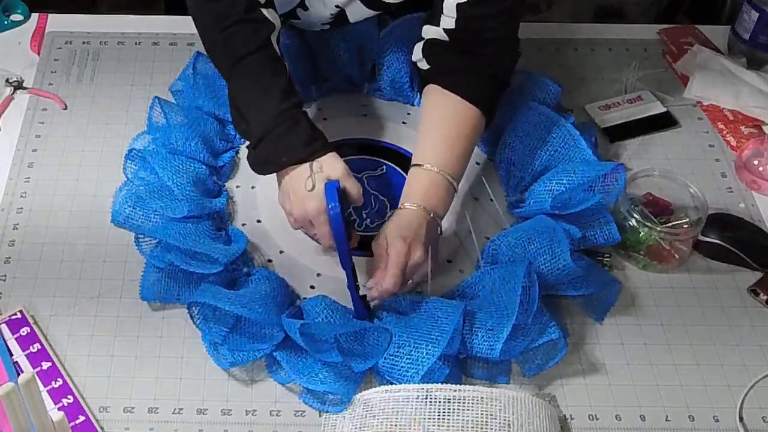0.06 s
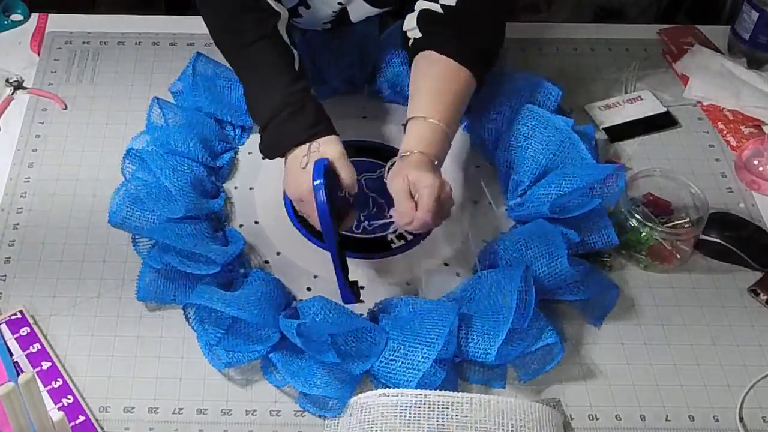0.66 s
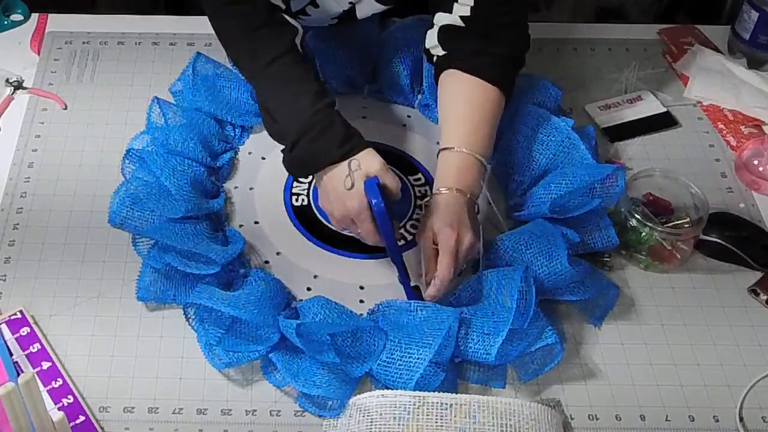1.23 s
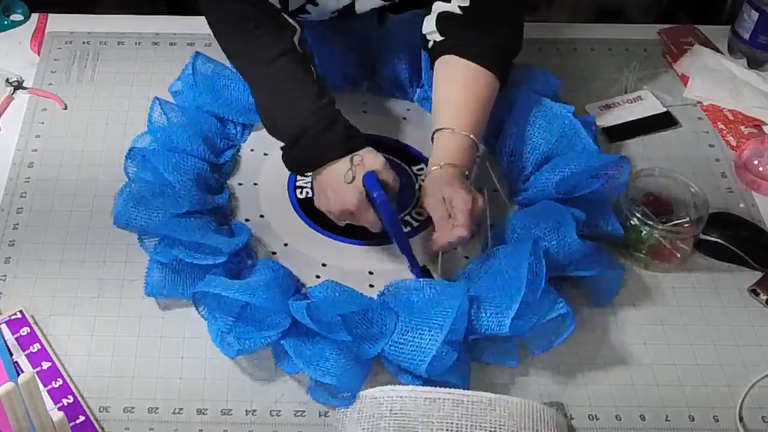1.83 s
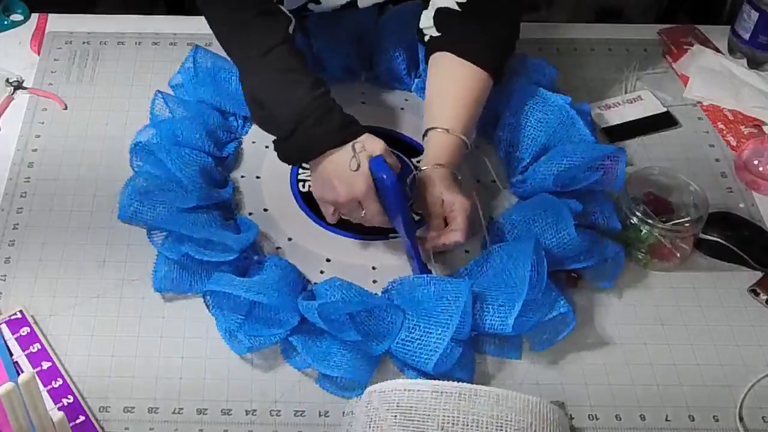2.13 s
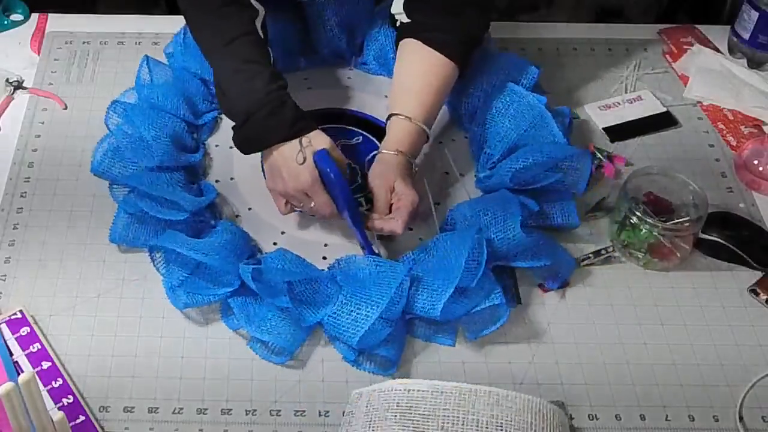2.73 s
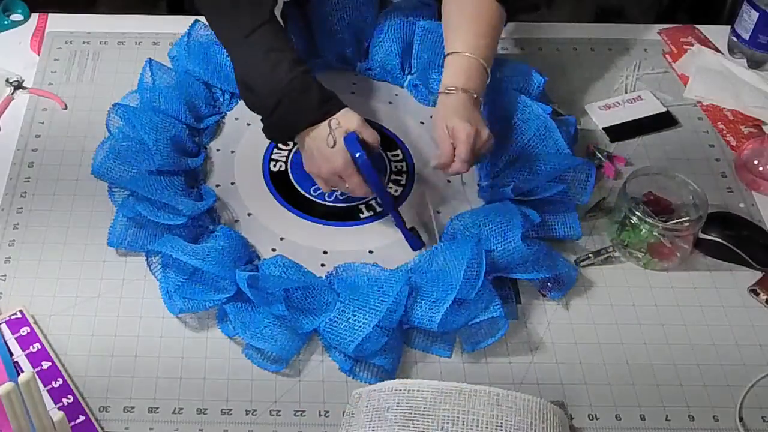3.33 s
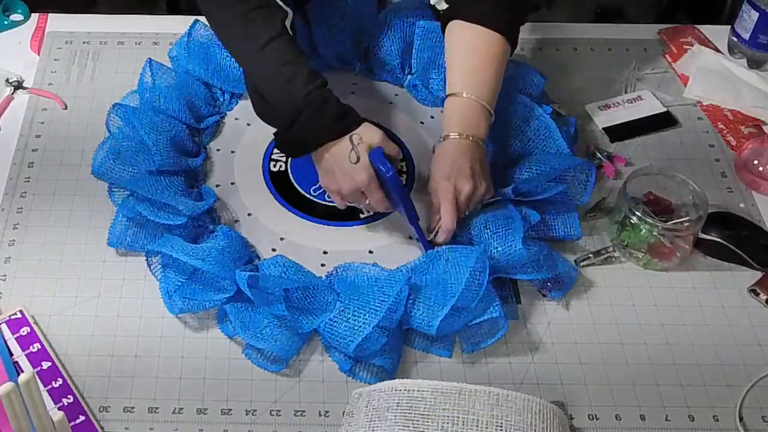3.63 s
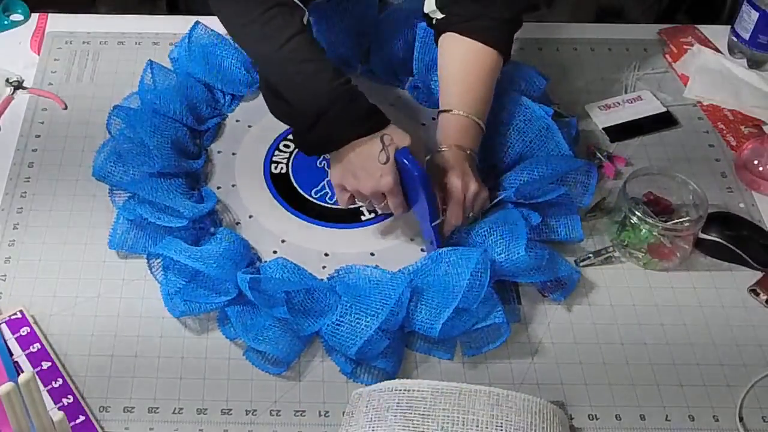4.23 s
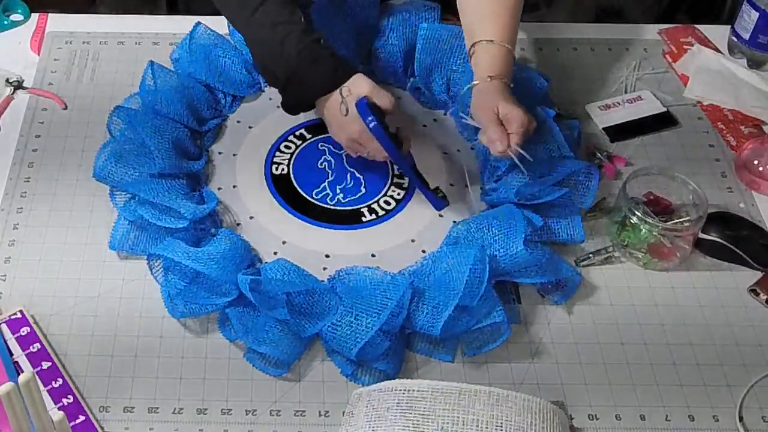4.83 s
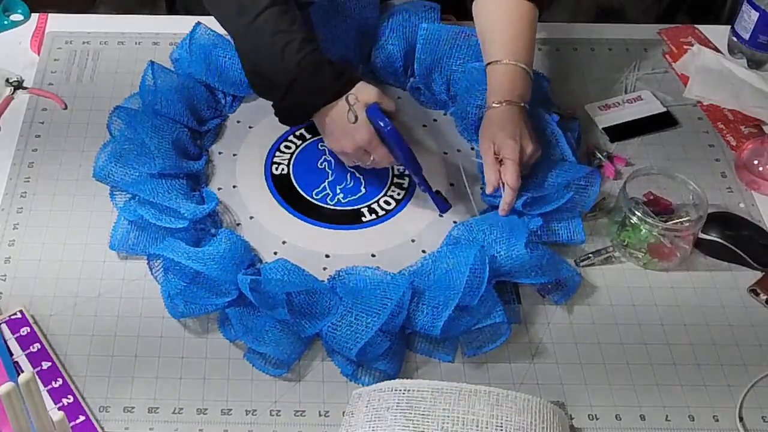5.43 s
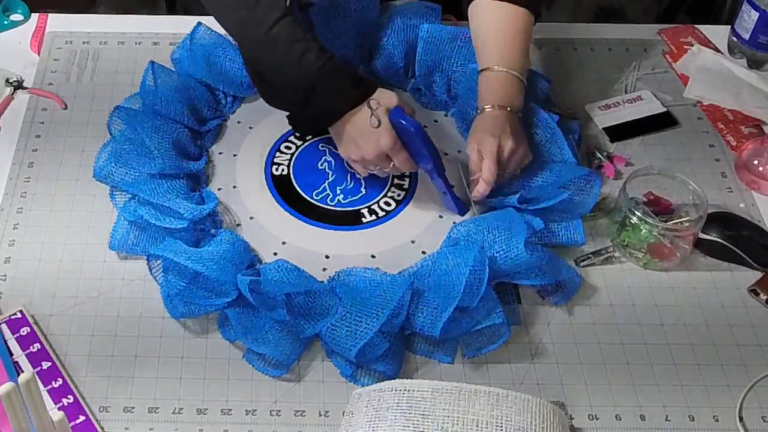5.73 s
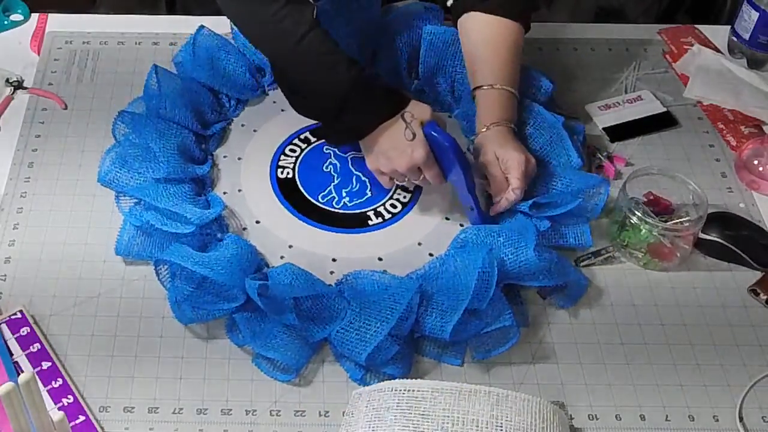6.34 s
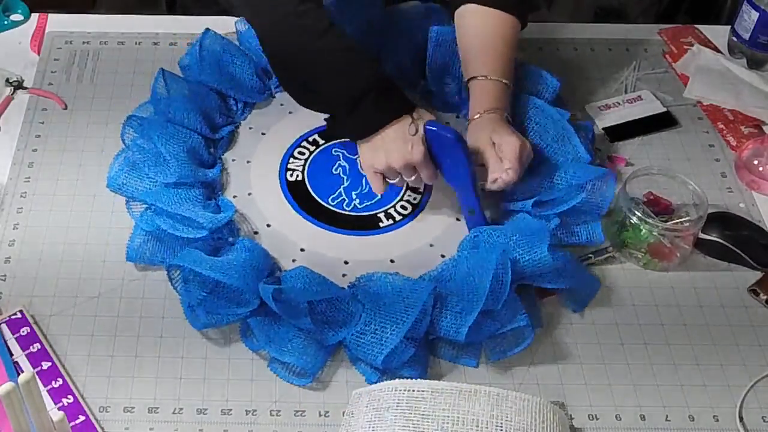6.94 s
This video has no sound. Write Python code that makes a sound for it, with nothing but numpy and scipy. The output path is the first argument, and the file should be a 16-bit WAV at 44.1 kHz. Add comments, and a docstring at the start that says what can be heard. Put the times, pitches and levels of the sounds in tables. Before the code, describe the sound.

A plastic zip tie gun fastens five ties, a second or more apart. Each squeeze gives a quick ratcheting tick and a loud, bright crack, and the first four are followed by the clack of the trigger springing back. Between ties, wreath mesh rustles faintly, the frame knocks lightly and a bangle clinks. It is heard close up at a work table in a small, live room with a low rumble.

```python
"""A plastic zip tie gun fastens five ties on a mesh wreath, on a work table in a small live room.
Each squeeze ratchets the tie through a pawl, the blade snaps it off with a loud crack, and a spring
clacks the trigger back. Between ties the mesh rustles, the frame knocks on the table and a metal
bangle clinks. The table top booms under hands and recoil, over a low room rumble."""
import sys
import numpy as np
from scipy import signal
from scipy.fft import rfft, irfft
from scipy.io import wavfile

SR = 44100
rng = np.random.default_rng(int(sys.argv[2]) if len(sys.argv) > 2 else 0)


def bounce(signal):
    """Save signal as a 16-bit WAV file at the path given by the first command-line argument."""
    frames = np.transpose(np.atleast_2d(signal))
    limited = np.clip(frames, -1, 1)
    pcm = np.round(limited * 32767).astype(np.int16)
    wavfile.write(sys.argv[1], SR, pcm)


N = 307641
TIME = np.arange(N) / SR
PATHS = 5  # left microphone, right microphone, three walls
CUTOFF_HZ = 15700

# Blade and table spectra. Each row: frequency in Hz, relative level in dB.
BLADE_SPECTRUM = [(60, -25.5), (300, -20.5), (700, -16.5), (900, -18), (1200, -13.5), (1750, -11),
                  (2800, -5), (4500, -2.5), (6500, 0), (9000, 1.5), (12000, 2.5), (14500, 2)]
TABLE_SPECTRUM = [(30, -18.5), (70, 3.5), (110, -2), (170, -7), (350, -7), (600, -20.5), (1500, -24),
                  (6000, -60.5)]
# Gun resonances. Each row: centre in Hz, width in Hz, boost in dB.
GUN_MODES = [(1345, 180, 4), (2270, 220, 9.5), (3790, 260, 4.5), (6150, 180, 6), (6980, 340, 5.5),
             (7670, 160, 1.5), (8780, 200, 5.5)]
# Cuts. Each row: start in seconds, level in dB, tilt in dB/octave, t60 in seconds, latch level in dB,
# thump level in dB, ring in Hz, ring boost in dB.
CUTS = [(0.5366, -2, -0.5, 0.018, -15, -35.5, 3850, 1), (1.7431, -3.5, -1, 0.023, -25, -37, 1214, 8.5),
        (2.937, -1.5, -2, .016, -17.5, -42, 1268, 6.5), (4.5045, -1.5, -2, 0.011, -14.5, -36, 6220, 1.5),
        (6.941, -6, -0.5, 0.04, -17.5, -44.5, 2050, 10.5)]
THUMP_T60_S = 0.13


def blade_cuts(latch_lead_s=0.0048, ring_width_hz=220):
    """The tension latch trips, the blade slams through, and the recoil thumps the table."""
    out = np.zeros((PATHS, N))
    for start_s, db, tilt_db, t60_s, latch_db, thump_db, ring_hz, ring_db in CUTS:
        modes = GUN_MODES + [(ring_hz, ring_width_hz, ring_db)]
        latch = colour(burst(t60_s=0.06, rise_s=0.0016, side_db=-15.5), BLADE_SPECTRUM, modes, -2.5)
        add(out, start_s - latch_lead_s, from_db(latch_db) * latch)
        snap = burst(t60_s, rise_s=0.0013, side_db=-12)
        add(out, start_s, from_db(db) * colour(snap, BLADE_SPECTRUM, modes, tilt_db))
        thump = burst(THUMP_T60_S, rise_s=0.003, side_db=-21)
        add(out, start_s, from_db(thump_db) * colour(thump, TABLE_SPECTRUM))
    return out


# Spring spectrum. Each row: frequency in Hz, relative level in dB.
SPRING_SPECTRUM = [(100, -41), (400, -27.5), (750, -27.5), (1400, -15.5), (2800, -2.5), (4800, 0),
                   (7000, 2), (9500, 6), (12000, 1.5), (14500, 8)]
# Slide and spring resonances. Each row: centre in Hz, width in Hz, boost in dB.
SLIDE_MODES = [(1420, 150, 6), (1750, 130, 4), (2117, 150, 8), (3666, 77, 9.5), (6245, 160, 5),
               (7300, 220, 5.5), (8850, 200, 3)]
# Slide contacts. Each row: share of run-up left, relative level in dB, added tilt in dB/octave,
# t60 in seconds.
RUN_UP = [(0.9, -25.5, -3, 0.046), (.52, -18.5, 0, .1), (0.11, -7, 1, .03)]
# Stop clack and spring rattle. Each row: relative level in dB, added tilt in dB/octave, t60 in seconds.
STOP = [(-3, 3, 0.039), (-4, -.5, .085)]
# Trigger releases. Each row: stop time in seconds, run-up in seconds, level in dB, run-up offset in dB,
# tilt in dB/octave, ring in Hz, ring boost in dB.
RELEASES = [(0.7618, 0.04, -19, 7.5, -1.5, 3800, -1), (1.9567, .034, -8, 0.5, -1, 1490, 4.5),
            (3.167, .038, -11.5, 0, -2, 2110, 5.5), (4.7114, 0.026, -8.5, 2, -1, 6400, 8.5)]


def trigger_returns(ring_width_hz=150):
    """The spring throws the slide home in a quick run of growing contacts, up to a hard stop."""
    out = np.zeros((PATHS, N))
    for stop_s, run_s, db, run_db, tilt_db, ring_hz, ring_db in RELEASES:
        modes = SLIDE_MODES + [(ring_hz, ring_width_hz, ring_db)]
        contacts = [(stop_s - share * run_s, run_db + hit_db, *rest) for share, hit_db, *rest in RUN_UP]
        contacts += [(stop_s, *part) for part in STOP]
        for start_s, hit_db, hit_tilt_db, t60_s in contacts:
            hit = burst(t60_s, rise_s=0.0012, side_db=-6)
            clack = colour(hit, SPRING_SPECTRUM, modes, tilt_db + hit_tilt_db)
            add(out, start_s, from_db(db + hit_db) * clack)
    return out


# Pawl spectrum. Each row: frequency in Hz, relative level in dB.
PAWL_SPECTRUM = [(100, -16.5), (500, -25.5), (1000, -23.5), (1400, -11), (2800, -9), (4800, -8.5),
                 (7000, -0.5), (11000, -3.5), (14500, -2.5)]
# Pawl resonances. Each row: centre in Hz, width in Hz, boost in dB.
PAWL_MODES = [(1460, 140, 4), (2280, 590, 12), (3747, 370, 9.7)]
# Squeezes. Each row: start in seconds, first gap in seconds, slip count, first slip level in dB,
# step per slip in dB, tilt in dB/octave, tie ring in Hz, ring boost in dB.
SQUEEZES = [(0.422, .0295, 5, -43.5, 1.1, 2, 2163, 8.5), (1.687, .0175, 3, -29, 0, 3.5, 1370, 6),
            (2.866, 0.014, 3, -33, 1, 1, 1847, 7), (4.3928, .047, 2, -32, -3, -.5, 3714, 9.5),
            (6.860, 0.023, 3, -30.5, -0.5, 3, 1840, 14.5)]


def ratchet(gap_ratio=0.59, creep_db=-15.5, ring_width_hz=190):
    """The taut tie rings as it slips through the pawl in quickening ticks, creeping in between."""
    out = np.zeros((PATHS, N))
    for start_s, gap_s, count, db, step_db, tilt_db, ring_hz, ring_db in SQUEEZES:
        gaps_s = gap_s * gap_ratio ** np.arange(count - 1)
        slips_s = np.cumsum([0, *gaps_s])
        pull = np.zeros((PATHS, SR // 2))
        add(pull, 0, from_db(creep_db) * radiated_noise(int(slips_s[-1] * SR), side_db=-7))
        for k, slip_s in enumerate(slips_s):
            add(pull, slip_s, from_db(k * step_db) * burst(t60_s=0.055, rise_s=0.001, side_db=-10.5))
        modes = PAWL_MODES + [(ring_hz, ring_width_hz, ring_db)]
        add(out, start_s, from_db(db) * colour(pull, PAWL_SPECTRUM, modes, tilt_db))
    return out


# Hoop modes. Each row: frequency in Hz, relative level in dB, t60 in seconds.
BANGLE_MODES = [(6400, -11, .02), (6830, -0.5, .03), (6960, 1, 0.03), (7268, -4, 0.025), (8000, -10, .015),
                (10450, -5, .025)]
# Clinks. Each row: start in seconds, peak level in dB.
CLINKS = [(2.0868, -20), (2.097, -25)]
# Slide along the wrist. Each row: time in seconds, level in dB.
BANGLE_SLIDE = [(2.3, -110), (2.4, -72.5), (2.47, -62), (2.49, -53.5), (2.58, -55), (2.62, -70),
                (2.7, -110)]


def bangle(chatter_per_s=300, size=4096):
    """Two clinks and a fine sliding chatter ring the modes of the metal hoop."""
    t = np.arange(size) / SR
    ring = sum(from_db(db - 60 * t / t60_s) * np.sin(2 * np.pi * hz * t)
               for hz, db, t60_s in BANGLE_MODES)
    touches = unit_rms(rng.standard_normal((PATHS, N)) * (rng.random(N) < chatter_per_s / SR))
    touches *= from_db(np.interp(TIME, *np.transpose(BANGLE_SLIDE))) / np.linalg.norm(ring)
    for start_s, db in CLINKS:
        touches[:, int(start_s * SR)] += from_db(db) / np.max(np.abs(ring))
    return signal.oaconvolve(touches, ring[None], axes=1)[:, :N]


# Frame spectrum. Each row: frequency in Hz, relative level in dB.
FRAME_SPECTRUM = [(100, -13), (600, -13), (1100, -12.5), (2100, -1), (3000, 0), (4500, -8.5), (7000, -18),
                  (15000, -31.5)]
# Frame resonances. Each row: centre in Hz, width in Hz, boost in dB.
FRAME_MODES = [(922, 53, 20), (1390, 45, 14), (1900, 67, 9), (3880, 400, 3.6)]
# Frame knocks and tie ticks. Each row: start in seconds, level in dB, tilt in dB/octave.
FRAME_KNOCKS = [(0.9322, -39, -1), (.988, -50, 0), (2.598, -54, -7), (2.611, -45.5, -14)]
TIE_TICKS = [(2.293, -49.5, -2.5), (2.305, -55, 0), (6.335, -63.5, -9), (6.408, -64, -6.5),
             (6.561, -60, -5.5), (6.60, -63, -7.5)]
# Table bumps. Each row: start in seconds, level in dB, t60 in seconds.
TABLE_BUMPS = [(1.921, -47, .07), (2.05, -49, 0.14), (2.082, -44, 0.14), (2.562, -58, .15),
               (4.713, -32, 0.03)]


def handling():
    """The hollow wreath frame is knocked and bumps the table; the tie ticks on the gun's nose."""
    out = np.zeros((PATHS, N))
    for start_s, db, tilt_db in FRAME_KNOCKS:
        knock = burst(t60_s=0.043, rise_s=0.0005, side_db=-12)
        add(out, start_s, from_db(db) * colour(knock, FRAME_SPECTRUM, FRAME_MODES, tilt_db))
    for start_s, db, tilt_db in TIE_TICKS:
        tick = burst(t60_s=0.046, rise_s=0.001, side_db=-9)
        add(out, start_s, from_db(db) * colour(tick, PAWL_SPECTRUM, PAWL_MODES, tilt_db))
    for start_s, db, t60_s in TABLE_BUMPS:
        bump = burst(t60_s, rise_s=0.0017, side_db=-36)
        add(out, start_s, from_db(db) * colour(bump, TABLE_SPECTRUM))
    return out


# Mesh spectrum. Each row: frequency in Hz, relative level in dB.
MESH_SPECTRUM = [(200, -2.5), (900, -1), (2000, -7), (4000, -6), (7000, -4.5), (12000, -6.5), (14500, -1)]
# Hand strokes. Each row: start in seconds, hold in seconds, level in dB.
STROKES = [(0.266, 0.11, -72.5), (1.195, 0.023, -75), (1.546, .04, -76.5), (2.312, .13, -60.5),
           (2.501, 0.092, -59), (3.528, .02, -70.5), (5.734, 0.021, -76), (6.036, .16, -70.5),
           (6.565, 0.23, -69.5)]


def mesh_rustle(catches_per_s=500, catch_db=14, folds_per_s=45, fold_db=2.5, grip_s=0.019, grip_db=-63):
    """Plastic threads rub at each stroke and grip: a hiss, uneven from fold to fold, with tiny catches."""
    strokes = sum(from_db(db) * swell(start_s, hold_s, attack_s=0.04, release_s=0.09)
                  for start_s, hold_s, db in STROKES)
    grips = sum(from_db(grip_db) * swell(squeeze_s - grip_s, grip_s, attack_s=0.012, release_s=0.09)
                for squeeze_s, *_ in SQUEEZES)
    folds = from_db(fold_db * np.interp(TIME * folds_per_s, np.arange(SR), rng.standard_normal(SR)))
    catches = 1 + from_db(catch_db) * (rng.random(N) < catches_per_s / SR)
    friction = unit_rms(catches * folds) * radiated_noise(N, side_db=-5.5)
    return colour(friction * (strokes + grips), MESH_SPECTRUM)


# Table top boom spectrum. Each row: frequency in Hz, relative level in dB.
BOOM_SPECTRUM = [(35, -34), (55, -13), (70, 0), (82, -11), (92, -7), (115, -20), (250, -47.5),
                 (1000, -91.5)]


def table_boom(rest_db=-69, lean_db=-60.5, lean_s=0.26, jolt_db=-10, jolt_rise_s=0.017):
    """The table top swings as hands lean on it before each cut and as recoils and bumps jolt it."""
    swings = [from_db(lean_db) * swell(cut_s - lean_s, lean_s, attack_s=0.12, release_s=0.9)
              for cut_s, *_ in CUTS]
    recoils = [(cut_s, thump_db, THUMP_T60_S) for cut_s, *_, thump_db, ring_hz, ring_db in CUTS]
    for start_s, db, t60_s in recoils + TABLE_BUMPS:
        jolt = swell(start_s + jolt_rise_s, hold_s=0.042, attack_s=jolt_rise_s, release_s=0.4)
        swings.append(from_db(db + jolt_db) * t60_s / THUMP_T60_S * jolt)  # short blows move it less
    envelope = np.sqrt(from_db(rest_db) ** 2 + sum(swing ** 2 for swing in swings))
    return envelope * steady_noise(1, BOOM_SPECTRUM)


# Room decay. Each row: frequency in Hz, t60 in seconds.
ROOM_T60 = [(70, .42), (250, .48), (900, .44), (2000, .43), (4000, .47), (7000, .44), (10000, .41),
            (15000, .365)]
# Reverb spectrum. Each row: frequency in Hz, gain in dB.
ROOM_SPECTRUM = [(70, 3), (250, 0.5), (600, -2), (1200, 3.5), (2200, -3), (4000, 0.58), (7000, -1.5),
                 (10000, -1), (15000, -5)]


def room_response(gap_s=0.0037, build_s=0.0036, early_db=-2, early_t60_s=0.039, size=32768):
    """Dense early reflections off the table, then a tail dying band by band; near mono in the bass."""
    t = np.arange(size) / SR
    hz = np.arange(size // 2 + 1) * SR / size
    mid, side = rfft(rng.standard_normal((2, size)))
    width = from_db(at_hz([(70, -26), (250, -14.5), (2500, -4)], hz))
    field = stereo(mid, width * side) / np.hypot(1, width) * from_db(at_hz(ROOM_SPECTRUM, hz))
    onset = np.clip((t - gap_s) / build_s, 0, 1)
    early = 1 + from_db(early_db - 60 * t / early_t60_s)
    centres_hz, t60s_s = np.transpose(ROOM_T60)
    response = 0
    for t60_s, band_weights in zip(t60s_s, np.eye(len(centres_hz))):
        band = irfft(field * np.interp(hz, centres_hz, band_weights))
        decay = onset * early * from_db(-60 * t / t60_s)
        response += band * decay / np.linalg.norm(decay)
    return response


def room_reverb(walls):
    """Each wall returns its share of the sound by its own reflections."""
    echoes = [signal.oaconvolve(wall[None], room_response(), axes=1)[:, :N] for wall in walls]
    return sum(echoes) / np.sqrt(len(walls))


# Room tone spectrum. Each row: frequency in Hz, relative level in dB.
RUMBLE_SPECTRUM = [(12, -48), (20, -20), (37, -15), (53, -10.5), (74, -4), (98, -11.5), (172, -17.5),
                   (234, -18.5), (270, -21.5), (513, -26.5), (825, -31), (1100, -35), (3000, -41),
                   (10200, -55), (16000, -60)]


def room_tone(db=-64, side_db=-12, mono_below_hz=170):
    """A steady low rumble with faint hiss above it."""
    mid, side = steady_noise(2, RUMBLE_SPECTRUM)
    side = signal.sosfilt(signal.butter(2, mono_below_hz, "high", fs=SR, output="sos"), side)
    return from_db(db) * stereo(mid, from_db(side_db) * side)


def close_microphones(pair, mono_below_hz=260):
    """Two closely spaced microphones hear the bass alike."""
    highpass = signal.butter(1, mono_below_hz, "high", fs=SR, output="sos")
    return stereo(pair.mean(axis=0), signal.sosfilt(highpass, (pair[0] - pair[1]) / 2))


def burst(t60_s, rise_s, side_db, size=4096):
    """A contact excites countless damped modes: noise with a fast rise and exponential decay."""
    t = np.arange(size) / SR
    envelope = np.minimum(t / rise_s, 1) * from_db(-60 * np.maximum(t - rise_s, 0) / t60_s)
    return envelope * radiated_noise(size, side_db)


def radiated_noise(size, side_db):
    """Unit noise per path: correlated at the microphones, independent towards each wall."""
    mid, side, *walls = rng.standard_normal((PATHS, size))
    width = from_db(side_db)
    return np.vstack([stereo(mid, width * side) / np.hypot(1, width), *walls])


def steady_noise(channels, spectrum, run_in=4096):
    """Coloured noise, at full level from the first sample."""
    return colour(rng.standard_normal((channels, N + run_in)), spectrum, size=8192)[:, -N:]


def colour(x, spectrum, modes=(), tilt_db=0, size=4096):
    """Unit-power minimum-phase filter: broad spectrum, resonances, tilt per octave above 700 Hz."""
    hz = np.arange(size // 2 + 1) * SR / size
    db = at_hz(spectrum, hz) + tilt_db * np.log2(np.maximum(hz, 700))
    for centre_hz, width_hz, boost_db in modes:
        db += boost_db / (1 + (2 * (hz - centre_hz) / width_hz) ** 2)
    gain = from_db(db)
    gain /= np.sqrt(np.mean(gain ** 2 * (hz < CUTOFF_HZ)))
    cepstrum = irfft(np.log(gain))[:size // 2]
    cepstrum[1:] *= 2
    response = irfft(np.exp(rfft(cepstrum, size)))[:size // 2]
    return signal.oaconvolve(x, response[None], axes=1)[:, :x.shape[1]]


def swell(full_s, hold_s, attack_s, release_s):
    """Envelope that peaks at full_s, holds, then falls 60 dB in release_s."""
    attack = np.clip(1 + (TIME - full_s) / attack_s, 0, 1) ** 2
    return attack * from_db(-60 * np.clip((TIME - full_s - hold_s) / release_s, 0, 2))


def at_hz(points, hz):
    """Interpolate a spectrum over log frequency."""
    points_hz, values = np.transpose(points)
    return np.interp(np.log(np.maximum(hz, 1)), np.log(points_hz), values)


def add(out, start_s, sound):
    i = int(start_s * SR)
    out[:, i:i + sound.shape[-1]] += sound[..., :N - i]


def stereo(mid, side):
    return mid + side * np.array([[1], [-1]])


def from_db(db):
    return 10 ** (np.asarray(db) / 20)


def unit_rms(x):
    return x / np.sqrt(np.mean(x ** 2) + 1e-20)


def scene(left_db=-1.92, right_db=-1.5):
    """Gun and hands close by, their room reflections, room tone and table boom."""
    # Each row: source, reverb send in dB.
    sources = [(blade_cuts(), -3.5), (trigger_returns(), -4.5), (ratchet() + mesh_rustle(), -0.5),
               (handling(), -6), (bangle(), -7)]
    direct = sum(paths[:2] for paths, _ in sources)
    walls = sum(from_db(send_db) * paths[2:] for paths, send_db in sources)
    pair = close_microphones(direct + room_reverb(walls)) * from_db([[left_db], [right_db]])
    return pair + room_tone() + table_boom()


def record(dry):
    """Round the loudest cracks, clip at full scale, then low-pass."""
    knee = 2.2
    clipped = np.clip(knee * np.tanh(dry / knee), -1, 1)
    return signal.sosfilt(signal.ellip(10, 0.2, 70, CUTOFF_HZ, fs=SR, output="sos"), clipped)


dry = scene()
out = record(dry)
bounce(out)
```